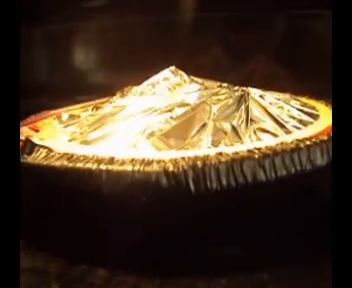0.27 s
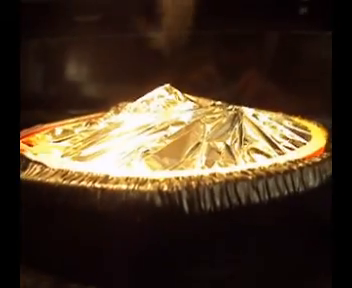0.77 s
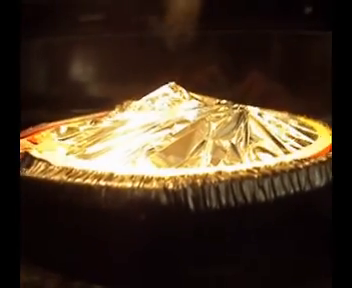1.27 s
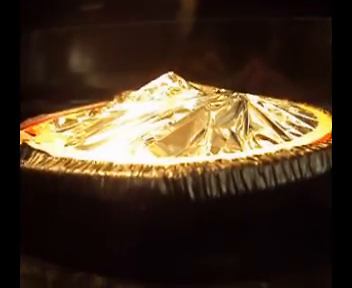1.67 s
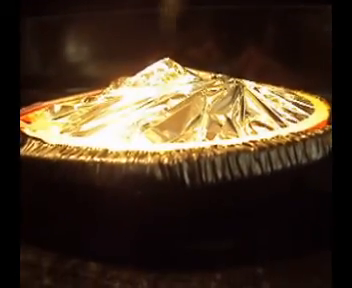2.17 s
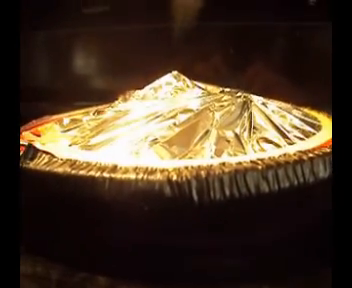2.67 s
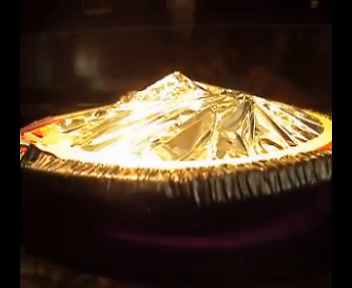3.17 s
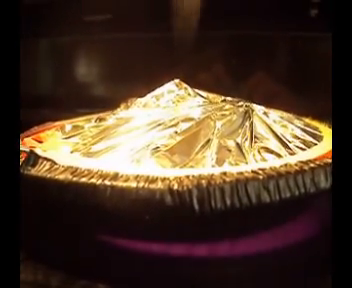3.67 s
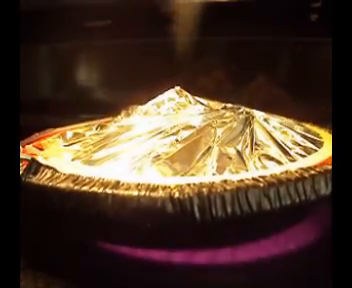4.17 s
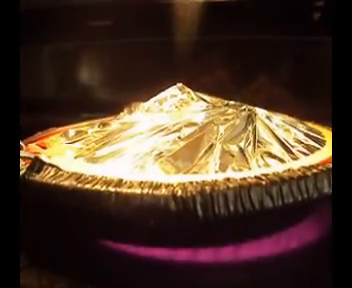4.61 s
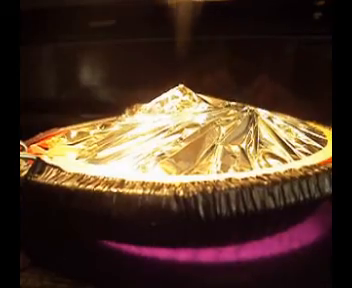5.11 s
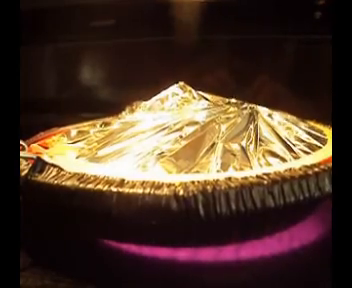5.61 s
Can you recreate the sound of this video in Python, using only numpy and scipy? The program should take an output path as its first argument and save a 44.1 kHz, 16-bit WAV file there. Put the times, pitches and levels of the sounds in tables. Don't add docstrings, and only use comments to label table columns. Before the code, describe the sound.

Popcorn kernels burst one by one under a foil cover, sharp hollow metallic pops with quick rattles over faint sizzling oil and hum.

```python
import sys
import numpy as np
from scipy import signal
from scipy.fft import rfft, irfft
from scipy.io import wavfile

SR = 44100
rng = np.random.default_rng(int(sys.argv[2]) if len(sys.argv) > 2 else 0)


def magnitude_from_level(level_db):
    exponent = np.asarray(level_db, float) / 20
    return 10 ** exponent


def dump_mix(stems):
    frames = np.atleast_2d(stems).T
    limited = np.clip(frames, -1, 1)
    pcm = np.round(limited * 32767).astype(np.int16)
    wavfile.write(sys.argv[1], SR, pcm)


N = 257984

BURST_TIMES = [.6148, .9791, 1.8170, 2.2595, 2.5683, 2.8638, 3.2644, 3.6571, 4.0168, 4.5685, 4.6777, 4.7767,
               5.4045, 5.6932, 5.7472]
# (peak level [dB], drumming length [ms], snap level [dB], rattle level [dB], crinkle level [dB])
BURSTS = [(-4, 3.4, -11, -29.5, -32), (0.5, 7.1, -17.5, -30.5, -29.5), (-10.5, 5.6, -31, -24.5, -44),
          (-3, 2.5, -8, -23.5, -35), (4.5, 4.1, -13, -27, -29.5), (-5, 4.7, -5.5, -24, -46),
          (-2, 5, -10, -28, -34), (5.5, 1.56, -6.5, -34.5, -41.5), (-2, 3.5, -19, -26.5, -32),
          (-8, 11, -9.5, -23, -44), (-2, 10, -4, -24.5, -45), (1, 5.8, -10, -34, -56),
          (-3.5, 6.2, -11.5, -21.5, -31), (0, 6.1, -24, -31, -27.5), (-4, 4.1, -11.5, -24.5, -19)]
# (frequency [Hz], width [Hz], level [dB])
DOME = [(444, 413, -8), (690, 163, -3.5), (879.5, 221, 2), (1030, 239, 2.5), (1300, 158, -2),
        (1900, 207, -8.5)]
# (frequency [Hz], width [Hz], level [dB])
CRINKLE = [(2960, 340, 4), (3676, 1070, 1.5), (5200, 2930, -3)]
TICK_THUMP_DB, TICK_THUMP_HZ = -13.5, 420


def rms_one(x):
    return x / np.sqrt(np.mean(x ** 2) + 1e-20)


def band(x, low_hz, high_hz):
    return signal.sosfilt(signal.butter(2, [low_hz, high_hz], "band", fs=SR, output="sos"), x)


def resonate(x, modes):
    out = 0
    for k, (hz, width_hz, db) in enumerate(modes):
        r = np.exp(-np.pi * width_hz / SR)
        poles = [1, -2 * r * np.cos(2 * np.pi * hz / SR), r * r]
        out = out + (-1) ** k * magnitude_from_level(db) * signal.lfilter([1 - r, 0, r - 1], poles, x)
    return out


def grains(per_s, spread_db):
    sizes = magnitude_from_level(spread_db * np.minimum(rng.exponential(1, N), 4))
    signed = sizes * rng.choice([-1, 1], N)
    return rms_one(signed * (rng.random(N) < per_s / SR))


def lay(times, pieces):
    out = np.zeros(N + pieces.shape[1])
    for s, piece in zip(times, pieces):
        i = round(s * SR)
        out[i:i + len(piece)] += piece
    return out[:N]


def cut(x, times, envelopes):
    at = np.round(times * SR).astype(int)[:, None] + np.arange(envelopes.shape[1])
    pieces = x[at % N] * envelopes
    even = np.sqrt(np.sum(envelopes ** 2, axis=1) / np.sum(pieces ** 2, axis=1))
    return lay(times, pieces * even[:, None])


def swell(t, rise_s):
    return t / rise_s * np.exp(1 - t / rise_s)


def last_burst(s):
    k = np.maximum(np.searchsorted(BURST_TIMES, s) - 1, 0)
    return k, np.abs(s - np.array(BURST_TIMES)[k])


def bursts(drum_db=-11.0, drum_t60=0.036, rattle_t60=0.32, crinkle_t60=0.11):
    db, drum_ms, snap_db, rattle_db, crinkle_db = np.array(BURSTS).T[:, :, None]
    t = np.arange(SR // 2) / SR
    attack = np.minimum(t / 0.00031, 1)
    drumming = attack * magnitude_from_level(-60 * np.maximum(t - drum_ms / 1000, 0) / drum_t60)
    late = np.minimum(t / 0.0051, 1)
    s, dense, sparse = np.array(BURST_TIMES), grains(5000, 2.97), grains(450, 0.81)

    snap_env = drumming * magnitude_from_level(db + drum_db + snap_db + 3.0 - 60 * t / 0.11)
    rattle_env = late * magnitude_from_level(db + rattle_db - 60 * t / rattle_t60)
    crinkle_env = late * magnitude_from_level(db + crinkle_db - 60 * t / crinkle_t60)

    drum = cut(resonate(dense, DOME), s, drumming * magnitude_from_level(db + drum_db))
    snap = cut(resonate(dense, CRINKLE), s, snap_env)
    rattle = cut(resonate(sparse, DOME), s, rattle_env)
    crinkle = cut(resonate(sparse + 0.44 * dense, CRINKLE), s, crinkle_env)
    return drum + snap + rattle + crinkle


def thuds(rise_s=0.0041, gain_db=-1.0):
    # (peak level [dB], pitch [Hz])
    pan_bottom = [(-29.5, 112), (-29.5, 200), (-27.5, 140), (-18, 160), (-19, 160), (-30.5, 180),
                  (-25.5, 160), (-26, 130), (-27.5, 125), (-40, 240), (-31.5, 177), (-28, 89), (-18.5, 106),
                  (-14.5, 160), (-23, 149)]
    db, hz = np.array(pan_bottom).T[:, :, None]
    t = np.arange(SR // 10) / SR
    return lay(BURST_TIMES, magnitude_from_level(db + gain_db) * swell(t, rise_s) * np.sin(2 * np.pi * hz * t))


def knocks(contacts, rise_s=0.00085, thump_s=0.0012, overtone_db=-13.0):
    # (frequency [Hz], width [Hz], level [dB])
    dome_air = [(960, 430, -7), (1040, 390, -6)]
    snap_rise_s, loudest_snap_db = 0.0008, -13
    s, db, hz, thump_db, snap_db, thump_hz = np.array(contacts).T[:, :, None]
    rise_s = rise_s * magnitude_from_level(0.5 * np.clip(db + 9.5, 0, 12))
    t = np.arange(900) / SR
    chance = rng.normal(0, 1, (len(contacts), 2, 1))
    start = (s - rise_s)[:, 0] - 0.0004

    turn = 2 * np.pi * hz * (t - rise_s) + 0.34 * chance[:, 0]
    foil = swell(t, rise_s) * (np.cos(turn) + magnitude_from_level(overtone_db) * np.cos(1.63 * turn))
    struck = lay(start, magnitude_from_level(db - 0.5) * foil)

    thump_turn = 2 * np.pi * thump_hz * (t - rise_s) + 0.27 * chance[:, 1]
    thump = swell(t, thump_s) * np.cos(thump_turn)
    pushed = lay(start, magnitude_from_level(db + thump_db - 2.0) * thump)

    crinkle = resonate(rng.standard_normal(N), CRINKLE)
    snap_level = magnitude_from_level(np.minimum(db + snap_db - 7.5, loudest_snap_db))
    snap = cut(crinkle, start, swell(t, snap_rise_s) * snap_level)
    return snap - struck - pushed - resonate(struck, dome_air)


def slams():
    # (time [s], level [dB], foil pitch [Hz], thump level [dB], thump pitch [Hz])
    blows = [(0.6177, -18.5, 1136, 9.5, 580), (0.6213, -17, 1060, 8.5, 345),
             (0.9801, -5.5, 1270, -4.5, 460), (0.9853, -1.5, 1036, -33.5, 393),
             (1.819, -7.5, 905, 0.5, 535), (1.8254, -17.5, 1100, 6.5, 323), (2.1184, -23, 857, -3.5, 420),
             (2.262, -15.5, 1240, 5.5, 344), (2.2662, -2, 963, -15.5, 317), (2.5729, -2.5, 912, 0.5, 411),
             (2.6012, -4, 1040, -10, 352), (2.868, -1.5, 1077, -10.5, 340), (3.2677, -1, 1197, -7.5, 473),
             (3.2776, -9, 1040, -6.5, 200), (3.66, 2, 1063, -6.5, 603), (4.0218, -5, 1138, -3, 420),
             (4.5703, -7, 1040, -10.5, 620), (4.577, -12.5, 890, -3.5, 310),
             (4.683, -5.5, 1010, -11.5, 204), (4.7829, -3, 1010, -7.5, 454), (5.4076, -6, 1090, -5, 286),
             (5.6969, -1.5, 1014, -9.5, 390), (5.7504, -6.5, 1180, -25, 510),
             (5.7574, -8.5, 1104, 1.5, 510)]
    gain_db, fade_db_per_s, plain_snap_db = 7.5, 1500, -11.5
    s, db, hz, thump_db, thump_hz = np.array(blows).T
    k, since = last_burst(s)
    burst_db, _, bright_db = np.array(BURSTS)[k].T[:3]
    snap_db = burst_db + bright_db + gain_db - fade_db_per_s * since - db
    return np.transpose([s, db, hz, thump_db, np.maximum(snap_db, plain_snap_db), thump_hz])


def bounces():
    # (time [s], level [dB], foil pitch [Hz], snap level [dB])
    rebounds = [(0.6328, -14.5, 1240, -22), (1.0053, -13, 1300, 1.5), (1.0521, -22, 1180, -8),
                (1.814, -22.5, 1320, 1.5), (1.8639, -12.5, 1080, -8), (2.2813, -16.5, 940, -16),
                (2.333, -18.5, 880, -29), (2.3784, -21, 940, -13.5), (2.6111, -18, 1080, -26),
                (2.632, -17, 940, -19), (2.8907, -20, 990, -28.5), (2.9267, -18.5, 1060, -20),
                (3.2906, -14, 980, -30), (3.6648, -29, 1080, 5), (3.679, -15, 1180, -15),
                (3.693, -7.5, 1140, -1), (3.7151, -17, 1220, -6), (4.0327, -15, 1240, -30),
                (4.0736, -20, 1060, -10), (4.1008, -15.5, 1160, -31), (4.5879, -22, 950, -3),
                (4.6342, -18, 1060, -21), (4.68, -9.5, 1220, 4), (4.7024, -19, 1070, -10),
                (4.7454, -20, 1070, -6.5), (5.4199, -9.5, 1060, -4), (5.4284, -18, 990, -22),
                (5.444, -20, 1210, 4.5), (5.7631, -11.5, 1035, 1), (5.7698, -13.5, 1210, -9),
                (0.644, -20, 1080, -7.5), (0.992, -14.5, 980, -22), (1.0128, -23.5, 970, -21),
               (1.0338, -29, 980, -10), (1.0613, -30.5, 1330, -2.5), (2.2774, -29, 1087, -14),
               (2.3031, -30, 1010, -6), (2.313, -25, 1060, -11), (2.5843, -19, 1200, -19),
               (2.5933, -25, 1050, -18), (2.6154, -21, 1310, -8), (2.6418, -24.5, 1070, -4),
               (2.865, -23, 1130, 2.5), (2.9063, -22.5, 1030, -23), (3.298, -25, 1000, -13),
               (3.3132, -26, 960, -12), (3.7026, -23.5, 1020, -2), (4.019, -18.5, 1210, -25),
               (4.5833, -13, 1060, -5), (4.6896, -13, 1150, -3), (4.7084, -21.5, 925, 4),
               (4.7157, -21, 1370, -1), (4.727, -23, 1240, -3), (4.8063, -19, 1100, -23),
               (5.5146, -38, 1200, 7), (5.5457, -39, 1130, 4.5), (5.712, -17.5, 1150, -3),
               (5.776, -17, 1160, -22), (5.7907, -25, 1320, -14), (5.8225, -28, 1120, -2)]
    heavy_db, fade_db_per_s, thump_hz = -4.5, 281, 441
    s, db, hz, snap_db = np.array(rebounds).T
    thump_db = heavy_db - fade_db_per_s * last_burst(s)[1]
    return np.transpose([s, db, hz, thump_db, snap_db, thump_hz + 0 * s])


def patter(count=10):
    start_s, gap_s, slowing = 0.008, 0.006, 1.12
    gain_db, fade_db_per_s, spread_db = 1, 111, 1
    foil_hz, spread_hz, snap_db = 1060, 140, -5
    db, _, _, rattle_db, _ = np.array(BURSTS).T[:, :, None]
    uneven = rng.uniform(0.55, 1.5, (len(db), count))
    size, pitch = rng.normal(0, 1, (2, len(db), count))
    since = start_s + np.cumsum(gap_s * slowing ** np.arange(count) * uneven, axis=1)
    times = np.array(BURST_TIMES)[:, None] + since
    levels = db + rattle_db + gain_db - fade_db_per_s * since + spread_db * size
    rows = zip(times.flat, levels.flat, (foil_hz + spread_hz * pitch).flat)
    return [(s, db, hz, TICK_THUMP_DB, snap_db, TICK_THUMP_HZ) for s, db, hz in rows if s < N / SR]


def ticks():
    # (time [s], level [dB], foil pitch [Hz], snap level [dB])
    settling = [(0.0174, -38.5, 1120, -11), (0.1894, -40.5, 1000, -15), (0.7047, -29.5, 990, -30),
                (0.8112, -35, 990, -17), (0.9002, -42.5, 1100, -2), (1.04, -26, 920, -26),
                (1.0849, -25, 1010, -26), (1.212, -33, 1010, -24), (1.507, -55, 1000, -13),
                (1.8098, -20, 1170, -4.5), (1.9938, -38, 1020, -20), (2.2543, -25, 860, -27),
                (2.698, -44, 1320, 11.5), (2.7176, -32.5, 1090, -9), (3.3341, -31, 1520, -8),
                (3.3577, -29, 1010, -18), (3.4215, -33, 970, -17), (3.483, -36.5, 930, -15),
                (3.8075, -27.5, 1130, -11.5), (4.0023, -38, 1130, -15), (4.0558, -30, 1160, -9),
                (4.114, -20.5, 1050, -19), (4.6116, -26, 1400, -6), (4.7603, -23, 1130, -20),
                (4.834, -28, 1070, -24), (4.9186, -38, 1020, -15), (4.963, -37.5, 1260, -16),
                (5.4765, -28.5, 1250, -4), (5.5848, -36.5, 1370, -7), (5.8328, -23, 1130, -23)]
    return [(s, db, hz, TICK_THUMP_DB, snap_db + 6.5, TICK_THUMP_HZ) for s, db, hz, snap_db in settling]


def kitchen(x):
    # (from [Hz], to [Hz], level [dB], t60 [s])
    echo_bands = [(60, 300, -16.5, 0.26), (241, 810, -18.5, 0.27), (736, 4900, -22.5, 0.97),
                  (2410, 17600, -5.5, 0.44)]
    t = np.arange(SR // 2) / SR
    tail = 0
    for low_hz, high_hz, db, t60 in echo_bands:
        noise = rms_one(band(rng.standard_normal(len(t)), low_hz, high_hz))
        decay = magnitude_from_level(db - 60 * t / t60) * np.sqrt(1 / (t60 * SR))
        tail = tail + noise * decay * np.minimum(t / 0.004, 1)
    return signal.fftconvolve(x, tail)[:N]


def background(hiss_db=-50, sizzle_db=-4.0, spit_db=-61.0):
    # (frequency [Hz], density [dB per Hz])
    hiss_colour = [(15, 8.5), (30, -10), (60, -2), (210, -2.5), (360, -1.5), (800, -5), (1000, -3),
                   (1320, -5.5), (1520, -11), (2300, -17), (3100, -13.5), (4500, -16.5), (5100, -11.5),
                   (5700, -15)]
    # (frequency [Hz], rms level [dB])
    hum_partials = [(59, -68), (120, -67), (181, -72.5)]
    hz, t = np.fft.rfftfreq(N, 1 / SR) + 1, np.arange(N) / SR
    colour_hz, colour_db = np.array(hiss_colour).T
    colour = magnitude_from_level(np.interp(np.log(hz), np.log(colour_hz), colour_db))
    white = rng.standard_normal(N) + magnitude_from_level(sizzle_db) * grains(430, 0.81)
    hiss = magnitude_from_level(hiss_db) * rms_one(irfft(rfft(white) * colour, N))
    drops = magnitude_from_level(spit_db) * rms_one(resonate(grains(43, 4.5), DOME))
    hum = sum(np.sqrt(2) * magnitude_from_level(db) * np.sin(2 * np.pi * hz * t) for hz, db in hum_partials)
    return hiss + drops + hum


def scene():
    pan = bursts() + thuds()
    pan += knocks(np.vstack([slams(), bounces()]))
    pan += knocks(patter())
    pan += magnitude_from_level(-0.5) * knocks(ticks())
    pan = signal.sosfilt(signal.butter(2, 45, "high", fs=SR, output="sos"), pan)
    return (pan + kitchen(pan) + background())[None]


def roll_off(x):
    return signal.sosfilt(signal.butter(12, 16820, fs=SR, output="sos"), x)


def record(dry, knee=1.0):
    overload, offset = 0.715, -0.0021
    rounded = knee * np.tanh(dry / knee)
    dull = signal.sosfilt(signal.cheby2(14, 62, 6350, fs=SR, output="sos"), rounded)
    clipped = np.clip(dull + offset, -overload, overload)
    return roll_off(clipped)


dry = scene()
out = record(dry)
dump_mix(out)
```